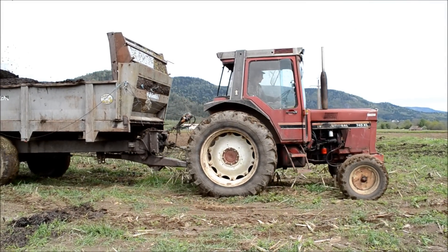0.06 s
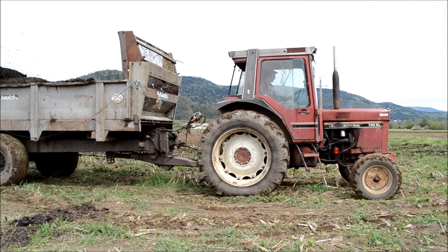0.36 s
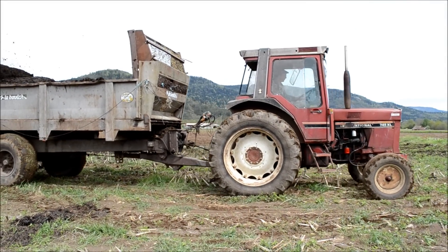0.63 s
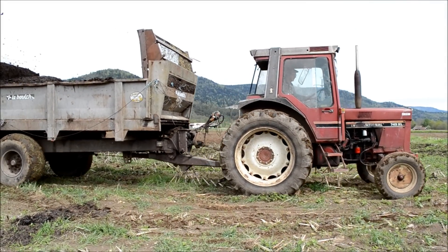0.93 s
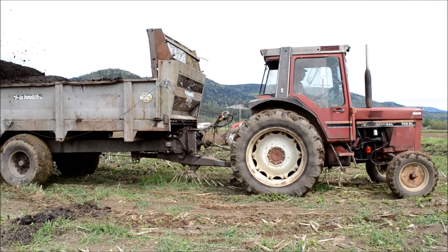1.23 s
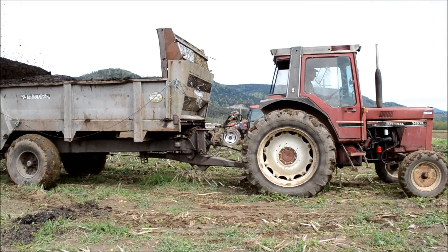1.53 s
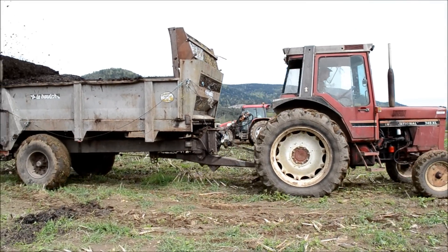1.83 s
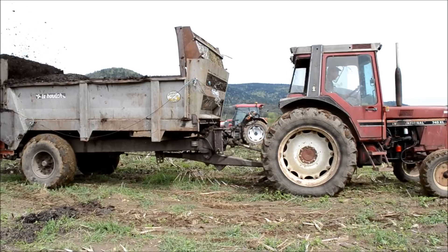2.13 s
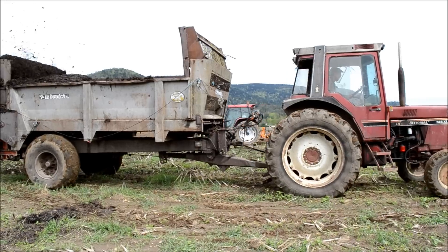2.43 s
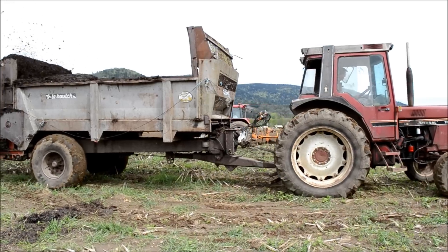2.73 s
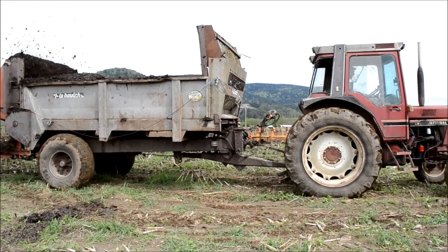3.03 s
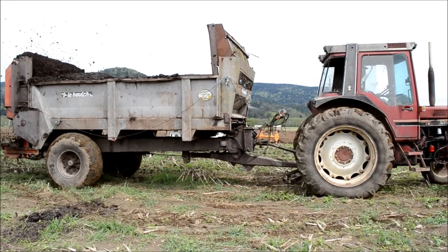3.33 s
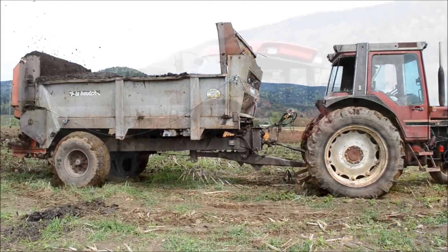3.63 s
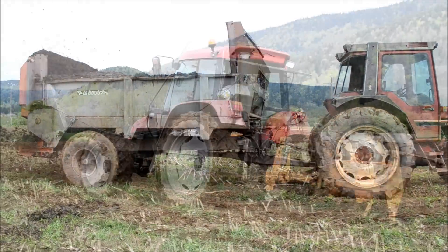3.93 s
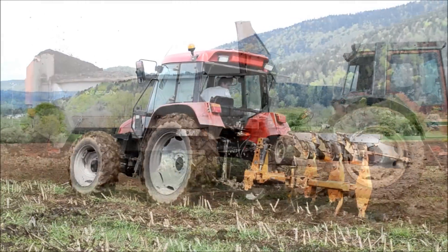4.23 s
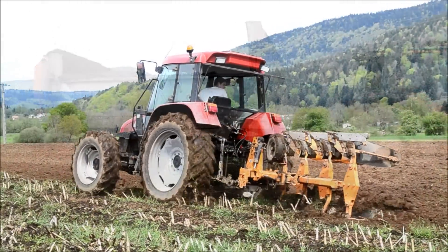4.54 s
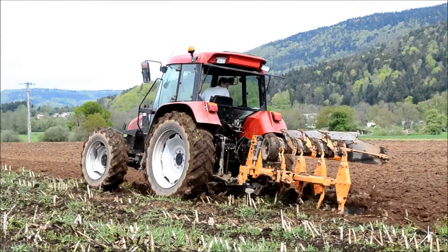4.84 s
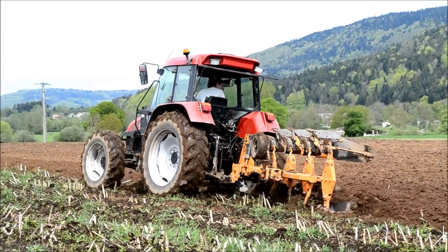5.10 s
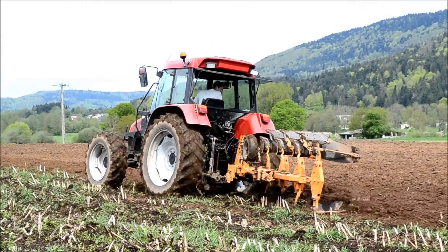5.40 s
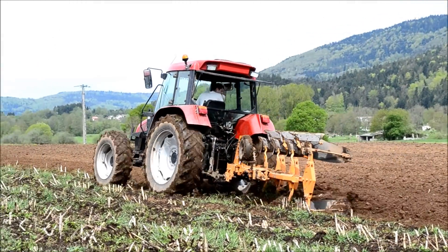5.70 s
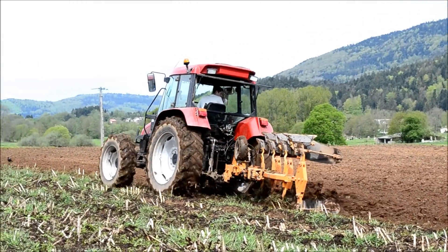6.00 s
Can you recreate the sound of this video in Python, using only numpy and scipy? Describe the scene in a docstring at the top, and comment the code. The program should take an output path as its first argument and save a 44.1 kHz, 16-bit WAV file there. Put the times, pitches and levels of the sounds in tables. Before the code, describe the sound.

From the start, a diesel tractor runs loud and close, with a fast pulsing exhaust, hard engine knock and a light gear whine. The manure spreader it pulls adds a bright shredding hiss, small ticking clods and a rapid, high chirping squeak. Hard lumps clank irregularly on its steel, most strongly near 0.7, 1.7 and 2 seconds. The engine speed rises briefly around 2.2 seconds as the rig passes, then the level falls from about 2.5 seconds. Between 3.5 and 4.8 seconds the sound crossfades into a second, more distant tractor ploughing. This one is quieter and duller, a steady engine drone with clatter and a slightly wavering gear whine. Muted metallic knocks come from the plough near 4.7 and 5.3 seconds. The drone eases a little toward the end, at about 6.3 seconds.

```python
"""A four-cylinder diesel tractor pulls a manure spreader past, across a field. Its firings form a pulse
train that excites the resonances of exhaust stack, panels and block. Gears whine, beaters shred the load,
a dry spot squeaks on every turn of the shaft, and hard lumps set the spreader's steel ringing.
The scene dissolves into a second, more distant tractor ploughing, with duller clatter and gear whine."""
import sys
import numpy as np
from scipy import signal
from scipy.fft import rfft, irfft, next_fast_len
from scipy.io import wavfile
from scipy.ndimage import map_coordinates

SR = 44100
rng = np.random.default_rng(int(sys.argv[2]) if len(sys.argv) > 2 else 0)


def waveform_to_disk(signal):
    """Save audio, clipped to [-1, 1], as 16-bit WAV at the path in sys.argv[1]."""
    frames = np.transpose(np.atleast_2d(signal))
    scaled = np.clip(frames, -1, 1) * 32767
    samples = np.round(scaled).astype(np.int16)
    wavfile.write(sys.argv[1], SR, samples)


N = 276066
TIME = np.arange(N) / SR
ABEAM_S = 2.3  # the first tractor is side-on
DISSOLVE_FROM_S, DISSOLVE_TO_S = 3.5, 4.79


def amp(db):
    """Decibels to gain."""
    return 10 ** (np.asarray(db) / 20)


def unit(x):
    """Normalisation to rms 1."""
    return x / np.sqrt(np.mean(x ** 2) + 1e-20)


def curve(rows):
    """Linear interpolation of (t/s, value) rows."""
    return np.interp(TIME, *np.transpose(rows))


def wobble(rate):
    """A smooth random curve, rate knots a second."""
    return map_coordinates(rng.standard_normal(int(N * rate / SR) + 4), [TIME * rate])


def filtered(x, response):
    """Linear filtering: the spectrum of x times a frequency response."""
    m = next_fast_len(N + SR // 2)
    return irfft(rfft(x, m) * response(np.fft.rfftfreq(m, 1 / SR)), m)[:N]


def coloured(x, points):
    """Spectral shaping by (f/Hz, level/dB) points; white noise keeps its power."""
    f, db = np.transpose(points)
    return filtered(x, lambda hz: unit(amp(np.interp(np.log(hz + 1), np.log(f), db))))


def resonant(x, modes):
    """Resonance at (f/Hz, bandwidth/Hz, level/dB) modes; white noise keeps its power."""
    def response(f):
        peaks = sum(amp(db) * 1j * f * w / (c * c - f * f + 1j * f * w) for c, w, db in modes)
        return unit(np.abs(peaks) ** 2)
    return filtered(x, response)


def passes(phase):
    """The samples at which a phase passes a whole number."""
    return np.flatnonzero(np.diff(np.floor(phase)) > 0)


def add(track, start, sound):
    """Superposition of a sound on a track from a given sample."""
    part = track[start:start + len(sound)]
    part += sound[:len(part)]


def burst(t60, attack):
    """An envelope that rises to 1 and decays exponentially; times in seconds."""
    t = TIME[:SR // 8]
    shape = amp(-60 * t / t60) * (1 - np.exp(-t / attack))
    return shape / shape.max()


def blows(hits, t60, attack):
    """Impact excitation: a noise burst for each (t/s, level/dB) row."""
    track, shape = np.zeros(N), burst(t60, attack)
    for s, db in hits:
        add(track, round(s * SR), amp(db) * shape * rng.standard_normal(len(shape)))
    return track


def firings(phase, t60, attack, alike, scatter_db, count=4):
    """A pulse train: each burst is partly its cylinder's repeating ring, partly fresh turbulence."""
    shape = burst(t60, attack)
    track = np.zeros(N + len(shape))
    cylinders = rng.standard_normal((count, len(shape)))
    for k, start in enumerate(passes(phase)):
        turbulence = rng.standard_normal(len(shape))
        ring = np.sqrt(alike) * cylinders[k % count] + np.sqrt(1 - alike) * turbulence
        add(track, start, amp(scatter_db * rng.standard_normal()) * shape * ring)
    add(track, 0, track[N:])  # the engine is already running at the start
    return unit(track[:N])


def tones(phase, orders, waver_db):
    """Partials at multiples of a phase, each wavering in strength."""
    return sum(amp(db + waver_db * wobble(9.6)) * np.sqrt(2)
               * np.sin(2 * np.pi * (k * phase + rng.random())) for k, db in orders)


# lowest exhaust harmonics: multiple of the firing rate, level/dB
BOOM_HARMONICS = [(1, -42.5), (2, -35.5)]
# the third harmonic: t/s, level/dB
THIRD_HARMONIC = [(0, -39.5), (1.7, -33), (1.9, -45), (2.15, -48), (2.45, -30), (3.2, -34)]
def boom(firing):
    """Periodic exhaust flow radiates deep harmonics of the firing rate."""
    return tones(firing, BOOM_HARMONICS + [(3, curve(THIRD_HARMONIC))], waver_db=0)


# exhaust stack response: f/Hz, level/dB
STACK = [(40, -43), (70, -12), (110, -5), (180, -9.5), (240, -3.5), (290, 2), (350, -5), (440, -10.5),
         (600, -12), (1200, -37.5)]
def exhaust(firing, rise_db_per_s=0.08):
    """Pipe resonance: the stack colours each puff of gas."""
    puffs = firings(firing - 0.1, t60=0.11, attack=0.0044, alike=0.16, scatter_db=0.5)
    return amp(-24.5 + rise_db_per_s * TIME) * coloured(puffs, STACK)


# bonnet and cab response: f/Hz, level/dB
PANELS = [(350, -50), (500, -14.5), (575, -2), (680, 0.5), (760, -4.5), (840, -2.5), (950, -8),
          (1100, -6.5), (1500, -43)]
def panels(firing):
    """Forced vibration: each firing shakes the thin panels."""
    shakes = firings(firing + 0.1, t60=0.11, attack=0.0064, alike=0.38, scatter_db=0.76)
    return amp(-22) * coloured(shakes, PANELS)


# engine block response: f/Hz, level/dB
BLOCK = [(700, -54), (950, -13.5), (1200, 4), (1330, -6.5), (1480, 2), (1620, -4), (1900, 2), (2100, 0),
         (2300, -5), (2570, -1), (2850, -12), (3400, -44), (6000, -36.5)]
def knock(firing):
    """Impulse excitation: combustion rings the block."""
    pulses = firings(firing + 0.1103, t60=0.15, attack=0.00077, alike=0.55, scatter_db=0.84)
    return amp(-20.5) * coloured(pulses, BLOCK)


# block modes: f/Hz, level/dB, t60/s
SLAP_MODES = [(1214, -6.5, 0.025), (1304, 1.5, 0.032), (1896, -12.5, 0.06), (2530, -7.5, 0.013)]
# each piston's blow, in firing order: level/dB
PISTON_DB = [-4.5, -3.5, -4, 0]
def piston_slap(firing, fall_db_per_s=2, scatter_db=0.5):
    """Damped vibration: each piston strikes its bore once a cycle, one harder than the rest."""
    track, t = np.zeros(N), TIME[:SR // 8]
    ring = sum(amp(db) * burst(t60, attack=0.0021) * np.sin(2 * np.pi * hz * t)
               for hz, db, t60 in SLAP_MODES)
    for k, start in enumerate(passes(firing + 0.1)):
        delay = round(abs(rng.normal(0, 0.0001)) * SR)  # clearance makes each blow a little late
        add(track, start + delay, amp(PISTON_DB[k % 4] + scatter_db * rng.standard_normal()) * ring)
    return amp(-22 - fall_db_per_s * TIME) * unit(track)  # the block turns away


def engine(turns, cutoff_hz=135):
    """Radiation efficiency: the narrow stack and thin panels give off little deep bass noise."""
    firing = 2 * turns
    harmonics = boom(firing)
    roar = exhaust(firing) + panels(firing) + knock(firing) + piston_slap(firing)
    radiation = lambda hz: (hz / cutoff_hz) ** 3 / np.sqrt(1 + (hz / cutoff_hz) ** 6)
    return harmonics + filtered(roar, radiation)


def gearbox(turns, abeam_width_s=0.76):
    """Tooth meshing: two gear pairs whine, loudest side-on."""
    meshes = [(32.3, 0), (55.3, -2)]  # multiple of the crank rate, level/dB
    abeam = np.exp(-((TIME - ABEAM_S) / abeam_width_s) ** 2)
    backlash = 0.011 * wobble(50)
    return amp(-34 + 4.5 * abeam) * tones(turns + backlash, meshes, waver_db=2)


# spectrum of shredding: f/Hz, level/dB
SHRED = [(400, -70), (1500, 1), (2500, -0.5), (3000, 0.5), (3400, 0), (3900, -2), (4600, -1.5),
         (5600, -3.5), (6400, -3.5), (7300, -5.5), (7850, -10.5), (8500, -4), (10500, -9.5), (11500, -29),
         (13000, -47)]
def beaters(turns, lumps_per_s=70):
    """Broadband noise of shredding, with a patter of lumps, over the engine's fine tick."""
    times = rng.uniform(0, N / SR, int(lumps_per_s * N / SR))
    sizes_db = 0.78 * np.minimum(rng.exponential(size=len(times)), 3)
    patter = unit(blows(zip(times, sizes_db), t60=0.0078, attack=0.00046))
    tick = firings(4 * turns, t60=0.0036, attack=0.000062, alike=0.29, scatter_db=5)
    rush = amp(1.1 * wobble(24.4)) * rng.standard_normal(N)
    return amp(-25) * coloured(unit(rush + amp(-6.5) * patter + amp(-10) * tick), SHRED)


def squeak(turns, low_hz=4950, high_hz=5320, chirp_s=0.007, fall_db_per_s=1):
    """Friction: a dry spot chirps low, then high, once a turn, more lightly every second turn."""
    hidden_db = fall_db_per_s * np.maximum(TIME - ABEAM_S, 0)  # screened once the rig has passed
    level_db = -21.5 + 1.5 * wobble(5.2) - hidden_db
    track, length = np.zeros(N), round(chirp_s * SR)
    envelope = np.sin(np.linspace(0, np.pi, length))
    for k, start in enumerate(passes(turns + 0.22)):
        rub_db = level_db[start] - 7 * (k % 2) + 2 * rng.standard_normal()
        for slip, hz in enumerate((low_hz, high_hz)):
            pitch_hz = hz * (1 + 0.009 * rng.standard_normal())
            phase = np.cumsum(pitch_hz / SR + 0.0084 * rng.standard_normal(length))
            gain = amp(rub_db - slip + 2 * rng.standard_normal())
            add(track, start + round(slip * 0.8 * length), gain * envelope * np.sin(2 * np.pi * phase))
    return track


# hard lumps strike the spreader: t/s, level/dB, bars' share/dB
LUMP_HITS = [(0.0478, -15, -5), (0.138, -15.5, 7.5), (0.198, -13, 2), (0.6576, -15, -11), (0.745, -7, -6),
             (1.184, -13.5, -2), (1.742, -8, -9.5), (2.0062, -5.5, -4), (2.0194, -8, -1.5),
             (2.028, -14, -2), (2.2812, -16.5, -3), (2.4473, -10.5, -7), (2.638, -12.5, -9),
             (2.7473, -19, -9), (3.311, -22, -15), (3.5963, -14.5, -4), (3.6724, -18, -6)]
# side wall and beater bars: f/Hz, bandwidth/Hz, level/dB
WALL_MODES = [(2680, 540, 2), (3340, 250, -4)]
BAR_MODES = [(4040, 640, 2), (4430, 370, -5.5), (4840, 550, -1.5)]
# bright spectrum of struck steel: f/Hz, level/dB
CRACK = [(1000, -65), (5500, -3), (6300, -4), (7300, -4.5), (7900, -8), (8400, -5.5), (10500, -9.5),
         (12000, -33)]
def clanks():
    """Impacts excite the modes of wall and bars, damped by the load, with a crack on top."""
    times, db, bars_share_db = np.transpose(LUMP_HITS)
    wall = resonant(blows(zip(times, db), t60=0.045, attack=0.00022), WALL_MODES)
    bars = resonant(blows(zip(times, db + bars_share_db), t60=0.048, attack=0.00046), BAR_MODES)
    crack = coloured(blows(zip(times, db), t60=0.046, attack=0.00011), CRACK)
    return amp(-4.5) * wall + amp(-3.5) * bars + amp(-7) * crack


def clods(per_s=6.5, scatter_db=2.5):
    """Random impacts: small clods tick on the steel."""
    count = int(per_s * N / SR)
    hits = zip(rng.uniform(0, N / SR, count), -24 + scatter_db * rng.standard_normal(count))
    return coloured(blows(hits, t60=0.023, attack=0.0003), CRACK)


# second tractor's gear mesh: t/s, f/Hz
FAR_MESH = [(4.4, 284), (4.8, 280), (5.22, 273.5), (5.45, 278), (5.65, 274), (6.2, 281)]
# its loudness: t/s, level/dB
FAR_LEVEL = [(4.3, -29), (4.85, -26.5), (5.2, -28), (5.75, -28), (6.26, -31.5)]
# spectra of its clatter, notched by ground reflection, and of its exhaust puffs: f/Hz, level/dB
FAR_CLATTER = [(700, -31), (1080, -8.5), (1260, -7), (1580, -1.5), (1900, -5), (2200, -5), (2750, -15.5),
               (3600, -19), (4700, -20.5), (5750, -36.5), (6900, -26.5), (7900, -34.5), (8600, -29.5),
               (10000, -43.5), (11500, -71)]
FAR_PUFFS = [(26, -50), (50, -16), (115, -14), (170, -8.5), (240, -4.5), (375, -7), (430, -13), (560, -2.5),
             (640, -5.5), (950, -8), (1150, -6.5), (1500, -49.5)]
# its low engine drone and high gear tones: multiple of the firing rate, level/dB
FAR_ORDERS = [(1, -32), (3, -17), (4, -22.5), (7, -27), (12, -24.5), (25, -16.5), (30, -17.5), (40, -15)]
# its gear harmonics: multiple of the mesh, level/dB
WHINE = [(1, -14), (2, -17), (3, -17.5), (4, -21)]
def far_tractor(mesh_per_firing=5.18, ease_db_per_s=2.5):
    """Periodic excitation: the gear ratio locks the whine to the clatter, puffs and drone."""
    mesh = np.cumsum(curve(FAR_MESH)) / SR
    firing = mesh / mesh_per_firing
    clatter = coloured(firings(firing, t60=0.35, attack=0.00073, alike=0.16, scatter_db=2), FAR_CLATTER)
    puffs = coloured(firings(firing, t60=0.21, attack=0.0023, alike=0.44, scatter_db=1), FAR_PUFFS)
    orders = tones(firing + 0.00071 * wobble(16), FAR_ORDERS, waver_db=1)
    whine = tones(mesh + 0.016 * wobble(18), WHINE, waver_db=2)
    whine *= amp(-ease_db_per_s * (TIME - DISSOLVE_TO_S))  # eases as the tractor drives off
    return amp(curve(FAR_LEVEL)) * (clatter + amp(-8) * puffs + orders + whine)


# blows on the plough frame: t/s, level/dB
FRAME_HITS = [(4.704, -16), (4.722, -18), (5.29, -22), (5.296, -14.5), (5.306, -18.5)]
# its modes: f/Hz, bandwidth/Hz, level/dB
FRAME_MODES = [(1527, 150, 4), (1910, 140, 0.5), (2130, 130, 1), (2340, 290, 0), (3020, 370, -8),
               (4380, 560, -7)]
def plough(cutoff_hz=5200):
    """Modal ringing of the struck frame, dulled by distance."""
    frame = resonant(blows(FRAME_HITS, t60=0.038, attack=0.00042), FRAME_MODES)
    return filtered(frame, lambda hz: 1 / (1 + (hz / cutoff_hz) ** 6))


# first tractor's crank rotation: t/s, f/Hz
CRANK = [(0.0, 23.7), (0.88, 25.1), (1.9, 25.61), (2.17, 27.44), (2.77, 24.76), (2.95, 24.71),
         (3.42, 25.52), (3.71, 24.41), (4.1, 24.8)]
# the rig passes close by, then draws off: t/s, level/dB
PASS_LEVEL = [(0, 0), (1.3, -.7), (2.45, -1), (2.7, -3), (3.4, -6), (4.3, -12)]
def scene():
    """Equal-power crossfade: the spreading rig gives way to the ploughing tractor."""
    turns = np.cumsum(curve(CRANK)) / SR
    machinery = engine(turns) + gearbox(turns) + squeak(turns) + beaters(turns) + clods()
    rig = amp(curve(PASS_LEVEL)) * machinery + clanks()
    blend = np.pi / 2 * np.clip((TIME - DISSOLVE_FROM_S) / (DISSOLVE_TO_S - DISSOLVE_FROM_S), 0, 1)
    return (np.cos(blend) * rig + np.sin(blend) * (far_tractor() + plough()))[None]


def record(dry, threshold=0.17, lag_s=0.055, ceiling=0.92, low_hz=42, top_hz=11250):
    """Compression ducks after a loud blow, saturation rounds the peaks, and a band-pass follows."""
    pole = np.exp(-1 / (lag_s * SR))
    rms = np.sqrt(signal.lfilter([1 - pole], [1, -pole], dry[0] ** 2) + 1e-12)
    ducked = dry[0] * np.minimum(1, threshold / rms)
    rounded = ducked / (1 + np.abs(ducked / ceiling) ** 10) ** (1 / 10)
    low_cut = lambda hz: (hz / low_hz) ** 8 / np.sqrt(1 + (hz / low_hz) ** 16)
    return filtered(rounded, lambda hz: low_cut(hz) / np.sqrt(1 + (hz / top_hz) ** 160))[None]


dry = scene()
out = record(dry)
waveform_to_disk(out)
```